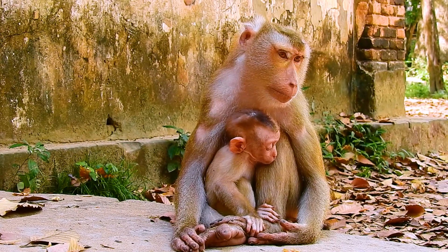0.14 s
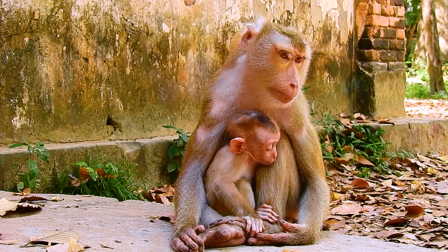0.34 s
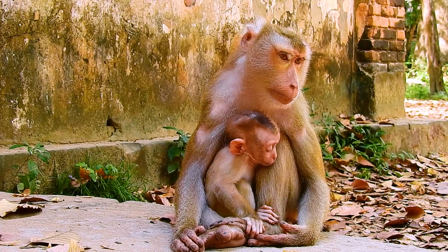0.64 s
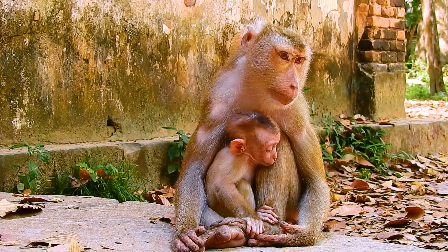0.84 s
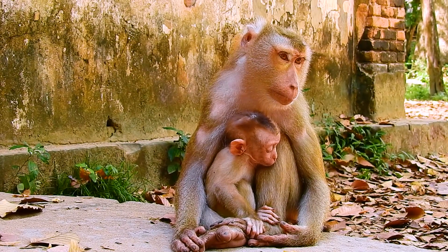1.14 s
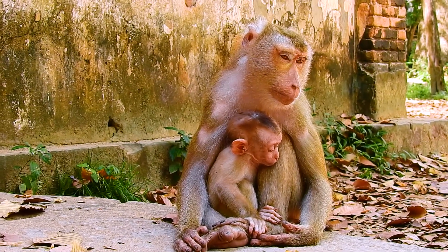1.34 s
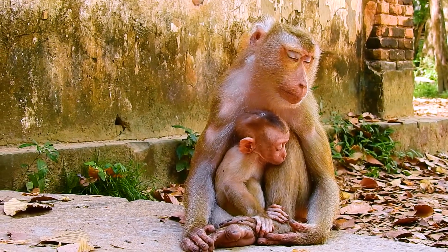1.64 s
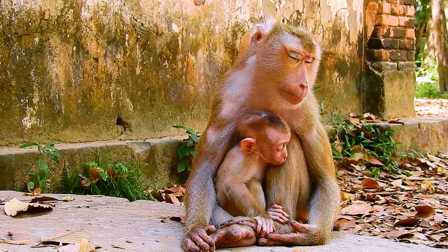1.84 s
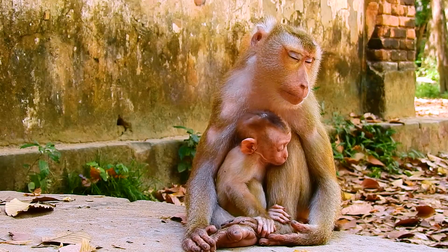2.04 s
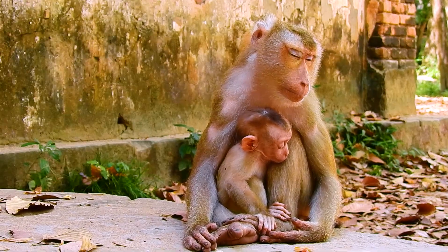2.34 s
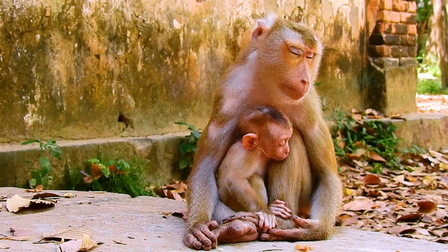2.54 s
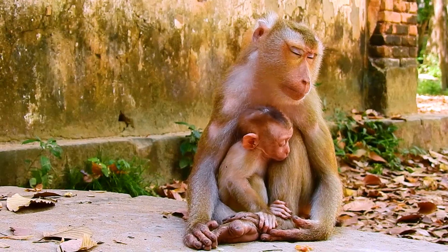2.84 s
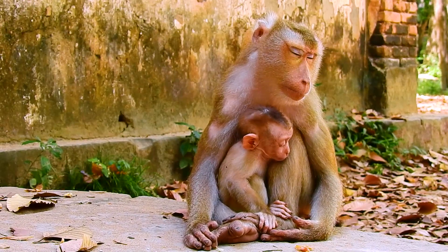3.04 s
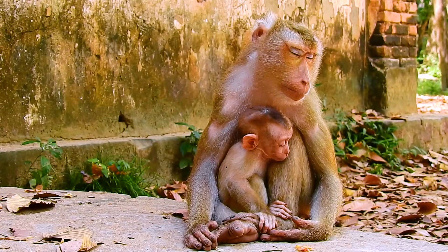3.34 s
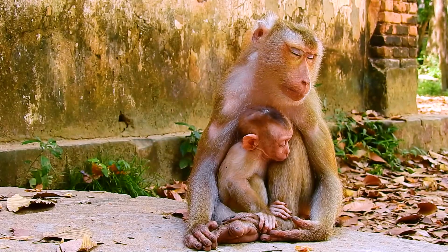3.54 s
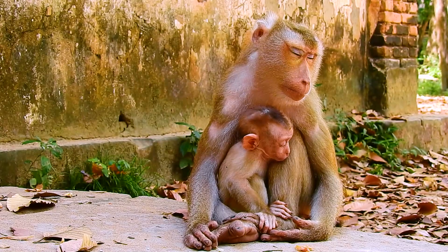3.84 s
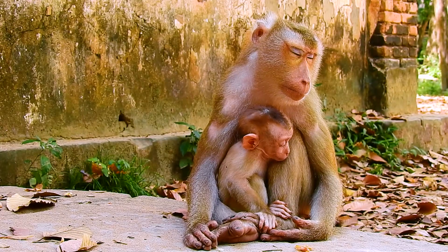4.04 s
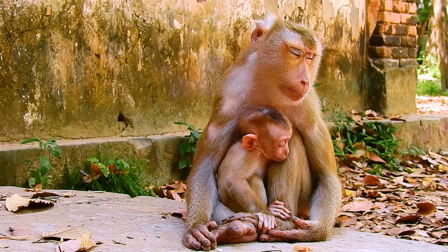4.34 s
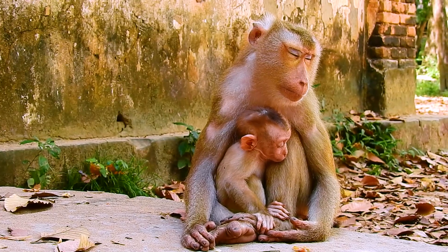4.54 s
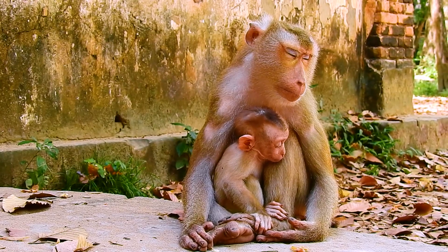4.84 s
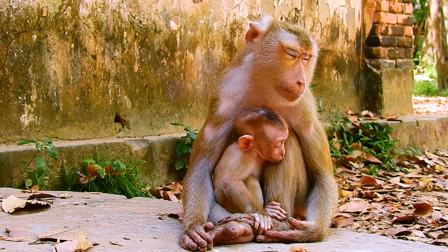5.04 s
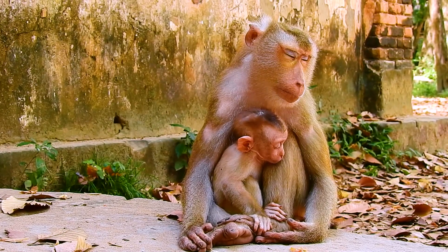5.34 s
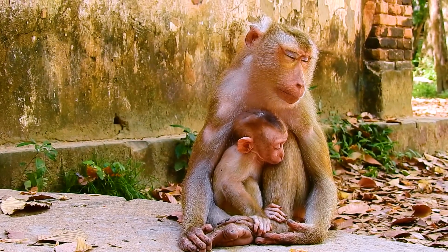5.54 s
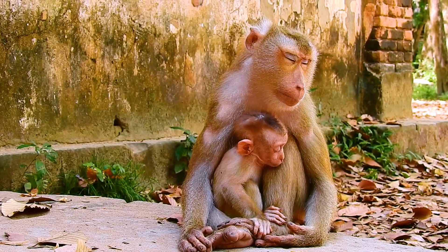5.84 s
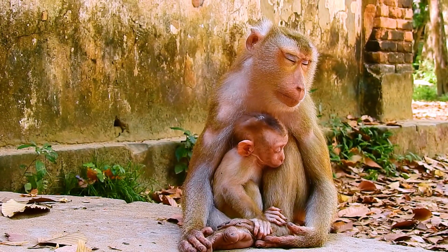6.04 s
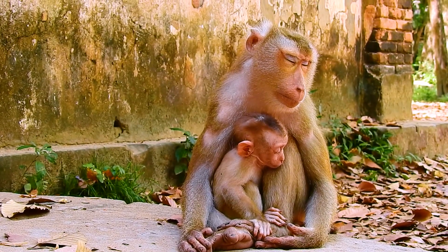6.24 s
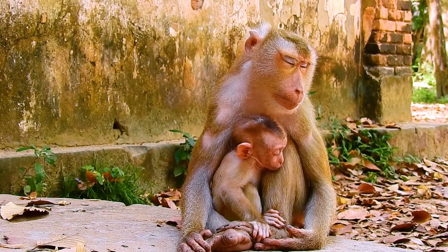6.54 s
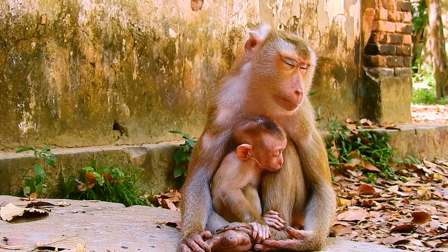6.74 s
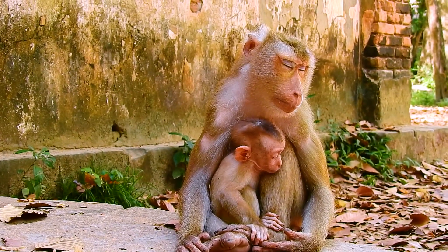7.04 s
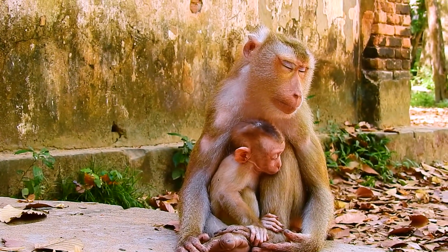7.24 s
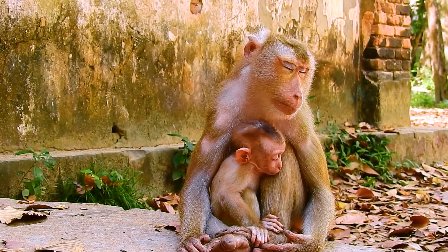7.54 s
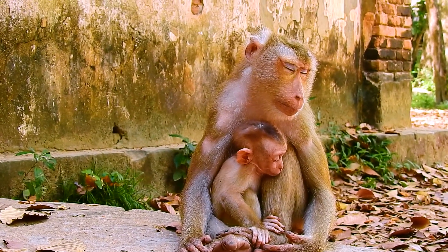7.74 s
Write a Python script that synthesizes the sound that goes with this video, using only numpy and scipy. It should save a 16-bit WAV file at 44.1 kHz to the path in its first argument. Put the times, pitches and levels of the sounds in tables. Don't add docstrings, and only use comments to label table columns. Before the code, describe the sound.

Daytime cicadas drone in a shrill, pulsing buzz over far road rumble, with dry leaf crackle, twig ticks and thin bird whistles.

```python
import sys
import numpy as np
from scipy import signal
from scipy.fft import rfft, irfft, next_fast_len
from scipy.io import wavfile
from scipy.ndimage import uniform_filter1d, map_coordinates

SR = 44100
rng = np.random.default_rng(int(sys.argv[2]) if len(sys.argv) > 2 else 0)


def put_to_file(sound):
    columns = np.atleast_2d(sound).T
    safe = np.clip(columns, -1, 1)
    whole_steps = np.round(safe * 32767)
    wavfile.write(sys.argv[1], SR, whole_steps.astype(np.int16))


def ratio_of_db(decibels):
    return 10 ** (np.asarray(decibels, float) / 20)


N = 347830


def unit(x):
    return x / np.sqrt(np.mean(x ** 2) + 1e-20)


def along(points, hz):
    f, v = np.transpose(points)
    return np.interp(np.log(hz + 1), np.log(f + 1), v)


def curves(rows):
    s, *cols = np.transpose(rows)
    return [np.interp(np.arange(N) / SR, s, c) for c in cols]


def wobble(rate):
    knots = rng.standard_normal(int(N * rate / SR) + 4)
    return map_coordinates(knots, [np.arange(N) * rate / SR])


def filtered(x, response):
    m = next_fast_len(x.shape[-1] + SR // 2)
    return irfft(rfft(x, m) * response(np.fft.rfftfreq(m, 1 / SR)), m)[..., :x.shape[-1]]


# frequency in Hz, likeness from 0 to 1.
LIKENESS = [(60, 0.97), (95, 0.99), (150, 0.99), (240, 0.88), (380, 0.84), (600, 0.79), (950, 0.85),
            (1500, 0.7), (2380, 0.79), (3770, 0.65), (5980, 0.37), (9470, 0.021), (15000, 0.11)]


def spread(pair, spectrum):
    def turned(hz):
        turn = np.arccos(np.clip(along(LIKENESS, hz), -1, 1)) / 2
        return ratio_of_db(along(spectrum, hz)) * [np.cos(turn), np.sin(turn)]

    mid, side = filtered(pair, turned)
    return unit(np.array([mid + side, mid - side]))


def rush(spectrum, patchy_db):
    z = signal.stft(rng.standard_normal((2, N)), nperseg=512)[2]
    field = uniform_filter1d(rng.standard_normal(z.shape[1:]), 6, 0)
    field = uniform_filter1d(field, 14, 1)
    noise = signal.istft(z * ratio_of_db(patchy_db * unit(field)), nperseg=512)[1][:, :N]
    return spread(noise, spectrum)


# frequency in Hz, time to fall 60 dB in seconds.
TRUNK_DECAY = [(2500, 1.1), (6000, .9), (11000, .5)]


def among_trees(x, wet_db, lag):
    hz, t, z = signal.stft(rng.standard_normal((2, SR)), SR, nperseg=256)
    decay = ratio_of_db(-60 * t / along(TRUNK_DECAY, hz)[:, None])
    tail = spread(signal.istft(z * decay, SR, nperseg=256)[1], [(1, 0)])
    tail = tail / np.linalg.norm(tail[0])
    wet = signal.fftconvolve(x[None], tail, axes=1)[:, :len(x)]
    direct = filtered(x, lambda f: np.exp(np.outer([-1j, 1j], np.pi * f * lag / SR)))
    return direct + ratio_of_db(wet_db) * wet


# delay in seconds, level in dB.
ECHOES = [
    (.027, -8),
    (.05, -13),
]


def echoed(x):
    return x + sum(ratio_of_db(db) * np.roll(x, round(s * SR)) for s, db in ECHOES)


def glide(s, length, from_hz, to_hz, db, edge_db):
    middle = (s + length / 2, (from_hz + to_hz) / 2, db)
    return [(s, from_hz, db - edge_db), middle, (s + length, to_hz, db - edge_db)]


def pure(hz):
    return 0 * hz


def voice(rows, overtone_db, count, fade, waver):
    hz, db, *colour = curves(rows)
    t = np.arange(N) / SR
    on = np.clip(np.minimum(t - rows[0][0], rows[-1][0] - t) / fade + 1, 0, 1)
    at = np.flatnonzero(on)
    phase = 2 * np.pi * np.cumsum((hz * (1 + waver * wobble(40)))[at]) / SR
    colour = [c[at] for c in colour]
    out = np.zeros(N)
    for k in range(1, count + 1):
        out[at] += ratio_of_db(overtone_db(k * hz[at], *colour)) * np.sin(k * phase)
    return np.sqrt(2) * out * on * ratio_of_db(db)


# time in seconds, level in dB.
ROAD_LEVEL = [(0.0, -42), (0.22, -42), (2.0, -42), (4.63, -41.5), (4.68, -40), (6.68, -42.5), (6.76, -40.5),
              (7.8, -43), (7.89, -45)]
# frequency in Hz, level in dB per Hz.
RUMBLE_TONE = [(12, -53), (20, -35), (54, -3.5), (135, 1.5), (156, -2.5), (227, -15), (258, -44.5),
               (330, -23.5), (430, -37), (730, -120)]
# frequency in Hz, level in dB per Hz.
ROAR_TONE = [(140, -43), (240, -1), (269, -4.5), (420, -7.5), (734, -11), (848, -6.5), (925, -8.5),
             (1750, -14.5), (2400, -21), (3120, -48), (5280, -120)]
# start in seconds, length in seconds, from Hz, to Hz, level in dB.
ENGINE_NOTES = [(0, 1.2, 108.3, 116, -47), (1.36, 0.9, 95, 92, -56), (0, 0.98, 172, 174.7, -54),
                (1.6, 1.66, 176.5, 178, -55.5), (3.95, 0.533, 152, 160, -50.5),
                (5.64, 0.99, 154.5, 150.4, -54)]
# time in seconds, firing rate in Hz, level in dB.
BIKE_THROTTLE = [
    (4.6, 128.4, -45.5),
    (5.1, 145.3, -47.5),
    (5.35, 144.9, -43),
    (5.7, 131, -52),
    (6.4, 128.5, -73),
    (6.8, 138, -46.5),
    (7.3, 148.1, -49),
    (7.89, 151, -48.5),
]


def traffic():
    busy_db, = curves(ROAD_LEVEL)
    lines = [glide(*row, edge_db=1) for row in ENGINE_NOTES] + [BIKE_THROTTLE]
    notes = sum(voice(rows, pure, count=1, fade=0.24, waver=0.0006) for rows in lines)
    flutter_db = 1 * wobble(4.5)
    rumble = ratio_of_db(busy_db - 1.5 + flutter_db) * rush(RUMBLE_TONE, patchy_db=-0.57)
    roar_db = -57 + 0.51 * (busy_db - busy_db.mean())
    return notes + rumble + ratio_of_db(roar_db) * rush(ROAR_TONE, patchy_db=2.25)


# middle in seconds, half length in seconds, level in dB, crispness in dB.
LEAF_PUSHES = [(0.27, 0.13, -57.5, -6), (1.072, 0.13, -58, -9), (1.328, 0.1, -65, -9),
               (1.66, 0.029, -65, -5), (1.87, 0.034, -61, -5), (2.388, 0.19, -61.5, -8.5),
               (3.322, .07, -69, -2), (3.618, 0.038, -57.5, -12), (4.158, 0.087, -57.5, -19),
               (4.654, 0.1, -60, -10), (4.92, 0.28, -63.5, -7), (6.002, 0.024, -54.5, -11),
               (6.04, 0.12, -61, -22), (6.83, 0.04, -56, -10), (7.008, 0.2, -59, -9),
               (7.497, 0.33, -69, -7)]
# frequency in Hz, level in dB per Hz.
CRISP_TONE = [(3500, -120), (4200, -9), (4800, 3.5), (6500, 6), (9000, -9), (12000, -21), (15600, -27),
              (16000, -120)]
# frequency in Hz, level in dB per Hz.
BODY_TONE = [(200, -120), (400, 5), (1500, 2), (3000, 2), (4500, 3.5), (6000, -120)]


def leaves():
    t = np.arange(N) / SR
    stir_db, stir_crisp_db = -65.5, -8
    body, crisp = ratio_of_db(stir_db), ratio_of_db(stir_db + stir_crisp_db)
    for s, half, db, crisp_db in LEAF_PUSHES:
        push = ratio_of_db(db) * np.exp(-((t - s) / half) ** 2)
        body = np.hypot(body, push)
        crisp = np.hypot(crisp, ratio_of_db(crisp_db) * push)
    crackle = unit(ratio_of_db(1.1 * wobble(400) + .8 * wobble(40)))
    edges = ratio_of_db(15.5) * crisp * rush(CRISP_TONE, patchy_db=2.5)
    mass = ratio_of_db(3) * body * rush(BODY_TONE, patchy_db=1.5)
    return crackle * (edges + mass)


# start in seconds, level in dB, pitch in Hz.
TWIG_TICKS = [(.728, -53, 2500), (0.96, -49, 3000), (1.158, -47, 2200), (1.887, -53, 4500),
              (2.066, -59, 2600), (2.256, -49, 5800), (2.414, -42, 1700), (2.492, -42, 1600),
              (2.503, -53, 3600), (2.65, -50, 9300), (3.172, -43, 1700), (3.181, -58, 5300),
              (3.513, -48, 3200), (3.601, -41, 1500), (3.62, -45, 1900), (3.7, -65, 4200),
              (4.096, -47, 3300), (4.109, -57, 4000), (4.314, -51, 3200), (4.678, -48, 3300),
              (5.966, -61, 2400), (6.414, -48, 2700), (6.793, -55, 3800)]


def twigs():
    knock_hz, crack_hz, snap_hz = 1700, 4300, 9300
    wood_hz = np.array([knock_hz, crack_hz, snap_hz])
    layers, t = np.zeros((3, N + SR)), np.arange(SR // 20) / SR
    envelope = ratio_of_db(-60 * t / .022) * (1 - np.exp(-t / .0006))
    for s, db, hz in TWIG_TICKS:
        band_db = db - 8 * np.log2(wood_hz / hz) ** 2
        crack = envelope * rng.standard_normal((3, len(t)))
        layers[:, round(s * SR):][:, :len(t)] += ratio_of_db(band_db[:, None] + 13) * crack

    def band(f, hz, width_hz):
        return 1j * f * width_hz / (hz * hz - f * f + 1j * f * width_hz)

    def bands(f):
        snap = band(f, snap_hz, 2600) / (1 + (f / 10800) ** 12)
        return np.array([band(f, knock_hz, 1800), band(f, crack_hz, 3000), snap]) ** 2

    wood = filtered(layers[:, :N], bands)
    return among_trees(wood.sum(0), wet_db=-9, lag=.3)


def squeal(s, length, settled_hz, db, open_db):
    u = np.linspace(0, length, num=24)
    tight = np.exp(-(u / .052) ** 2)
    hz = settled_hz * (1 + .17 * tight)
    level_db = db - 5 * (2 * np.sqrt(u / length) - 1) ** 2
    tight_db = -7
    tilt_db = open_db + (tight_db - open_db) * np.sqrt(tight)
    return np.transpose([s + u, hz, level_db, tilt_db])


# start in seconds, length in seconds, settled pitch in Hz, level in dB,
# open-mouth brightness in dB per octave.
MONKEY_CALLS = [
    (1.288, .16, 655, -61, 4),
    (5.03, .23, 880, -63, -16),
]
# frequency in Hz, level in dB.
THROAT_TONE = [(600, -25), (1300, -6), (2000, 1), (2950, 4), (3500, -1), (4600, -2), (6500, -12),
               (8000, -30)]


def monkey():
    def colour(hz, tilt_db):
        return along(THROAT_TONE, hz) + tilt_db * np.log2(np.maximum(hz / 2000, 1))

    calls = sum(voice(squeal(*row), colour, count=10, fade=.015, waver=.011) for row in MONKEY_CALLS)
    rough = ratio_of_db(4 * wobble(90))
    return among_trees(echoed(calls * rough), wet_db=-3, lag=-.3)


def whistle(s, fall, rise, best_hz, db):
    u = np.linspace(-fall, rise, num=24)
    hz = 4480 + 23800 * np.abs(u)
    off_best_khz = np.abs(hz - best_hz) / 1000
    level_db = db - 6.5 * off_best_khz - 2 * (u < 0)
    return np.transpose([s + u, hz, level_db])


# turning point in seconds, fall in seconds, rise in seconds, loudest pitch in Hz,
# level in dB.
BIRD_WHISTLES = [(.795, .085, .07, 6300, -55), (1.787, .075, .085, 5800, -55), (2.02, .1, .112, 6600, -54),
                 (3.237, .082, .1, 6000, -50), (3.986, .1, .115, 7000, -57),
                 (4.872, .077, .095, 5900, -53.5), (6.1, .1, .11, 6400, -53)]
# start in
# seconds, length in seconds, from Hz, to Hz, level in dB.
THIN_NOTES = [(.21, .12, 4250, 4100, -58), (.23, .12, 4400, 4600, -62), (.86, .12, 5900, 5800, -58),
              (4.96, .04, 6500, 6500, -57), (5.13, .15, 2900, 3030, -65), (5.19, .12, 5900, 5980, -58),
              (5.26, .16, 6030, 5930, -58), (7.655, .03, 6050, 5800, -50), (7.69, .08, 6300, 6750, -62)]


def bird():
    notes = sum(voice(whistle(*row), pure, count=1, fade=.008, waver=.005) for row in BIRD_WHISTLES)
    notes = notes + sum(voice(glide(*row, edge_db=4), pure, count=1, fade=.012, waver=.016)
                        for row in THIN_NOTES)
    flutter = ratio_of_db(3 * wobble(70) - 1.5)
    return among_trees(echoed(notes * flutter), wet_db=-4, lag=.4)


# share of the cycle from 0 to 1, tymbal rate offset in Hz, brightness in dB.
SONG_CYCLE = [(0, -.5, -3), (.08, -1.7, 3), (.2, -2.2, 0), (.31, -4.5, -5), (.42, -2, -4), (.58, 1.1, 5),
              (.8, 1.3, 0), (.92, 1.8, -4), (1, -.5, -3)]
# tymbal rate in Hz, cycle in seconds, cycle start in seconds,
# bend depth as a factor, level in dB, left lag in samples.
CICADA_SINGERS = [(542, .797, 0, 1, -3, 1.2), (542.3, .797, .37, .9, -5, .2), (542.5, .66, .2, .3, -4, .2),
                  (543.2, .83, .55, .7, -7, .5), (545.6, .72, .45, .7, -9, 0), (542.2, .9, .1, .5, -9, .4),
                  (548, .61, .3, .6, -17, .5)]
SINGER_DULLING = [0, 8, 9, 6, 4, 6, 4]
# multiple of the rate, level in dB.
RIB_OVERTONES = [(5, -60.5), (6, -82.5), (8, -77), (9, -71), (10, -44), (11, -61.5), (12, -65), (13, -66),
                 (14, -65), (15, -53), (16, -71), (20, -75)]
# time in seconds, level in dB.
CHORUS_SWELL = [(0, -50), (1.2, -48), (2.4, -48), (3.6, -49), (5.2, -48.5), (6.2, -48.5), (7.89, -48)]
# frequency in Hz, level in dB per Hz.
INSECT_HISS = [(1500, -120), (2000, -36), (2650, 8), (3000, -9), (3800, -14), (4700, -5), (5600, 6),
               (6500, -15), (7700, -3.5), (9000, -20.5), (11000, -22.5), (15700, -30.5), (16000, -120)]


def cicadas():
    lead = SR
    t = (np.arange(N + lead) - lead) / SR
    share, offset_hz, bright_db = np.transpose(SONG_CYCLE)
    out = 0
    for (rate, cycle, start, depth, db, lag), dull_db in zip(CICADA_SINGERS, SINGER_DULLING):
        place = (t - start) / cycle % 1
        drift_hz = np.pad(.5 * wobble(6) + .75 * wobble(25), (lead, 0), "reflect")
        hz = rate + depth * np.interp(place, share, offset_hz) + drift_hz
        stroke = np.exp(2j * np.pi * np.cumsum(hz) / SR).astype(np.complex64)
        shine = ratio_of_db((depth * np.interp(place, share, bright_db) - dull_db) / 5).astype(np.float32)
        song = 0
        for k, level_db in RIB_OVERTONES:
            tone = shine ** (k - 10) if k > 10 else ratio_of_db(dull_db * (10 - k) / 15)
            song = song + ratio_of_db(level_db) * (stroke ** k).imag * tone
        out = out + ratio_of_db(db) * among_trees(song, wet_db=2.1, lag=lag)[:, lead:]
    swell_db, = curves(CHORUS_SWELL)
    low = filtered(out, lambda hz: hz < 4000)
    low_db = -53 + 0.19 * (swell_db - swell_db.mean())
    chorus = ratio_of_db(low_db) * unit(low) + ratio_of_db(swell_db + 3.5) * unit(out - low)
    return chorus + ratio_of_db(-56.5) * rush(INSECT_HISS, patchy_db=1.4)


def scene():
    close = np.clip((N - np.arange(N)) / 60, 0, 1)
    mix = traffic() + leaves() + twigs() + monkey() + bird() + cicadas()
    return mix * ratio_of_db([[.25], [-.25]]) * close


def band_limit(x):
    return signal.sosfilt(signal.butter(12, 15700, fs=SR, output="sos"), x)


def record(dry):
    return band_limit(dry)


dry = scene()
out = record(dry)
put_to_file(out)
```